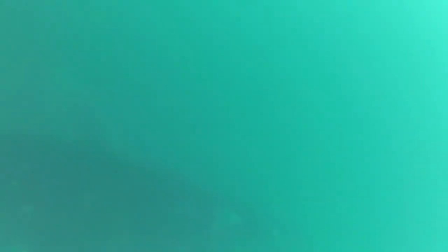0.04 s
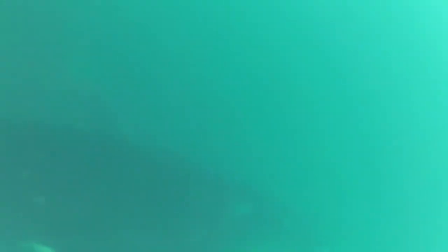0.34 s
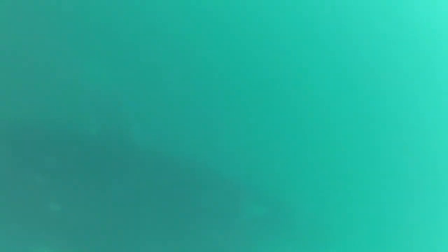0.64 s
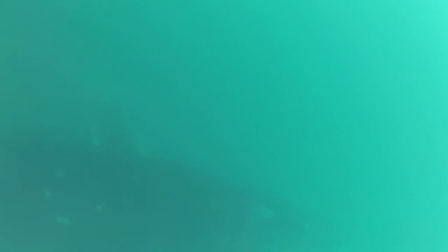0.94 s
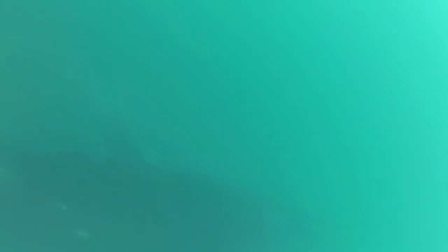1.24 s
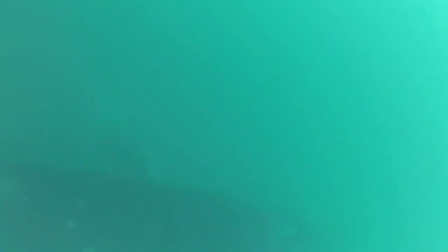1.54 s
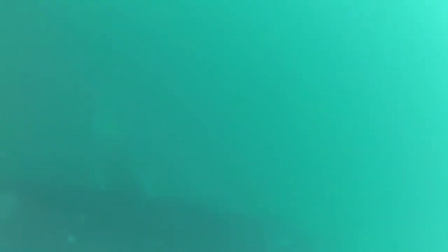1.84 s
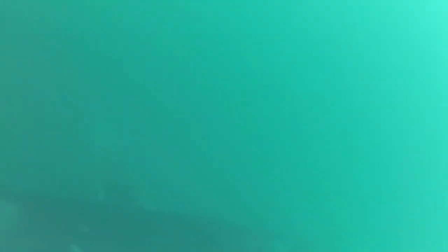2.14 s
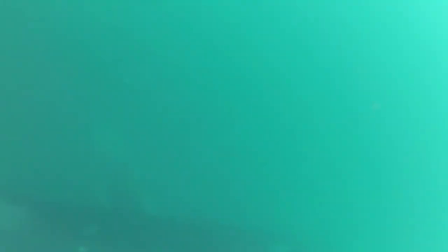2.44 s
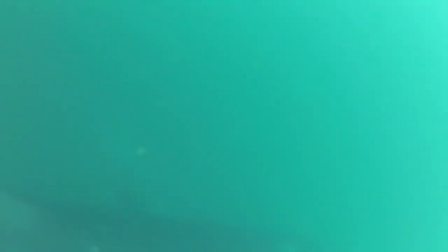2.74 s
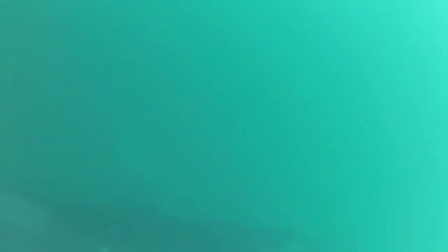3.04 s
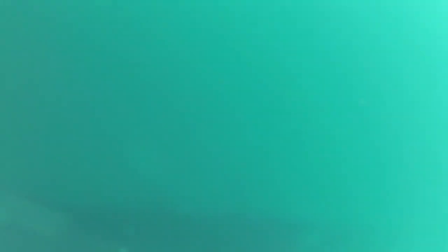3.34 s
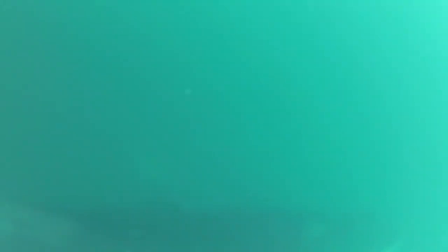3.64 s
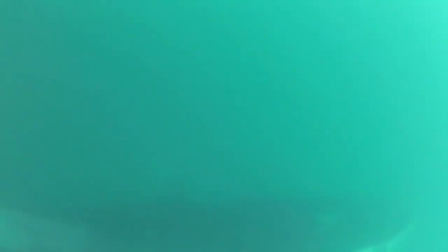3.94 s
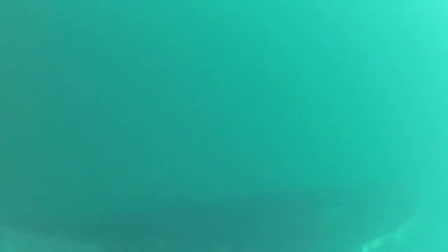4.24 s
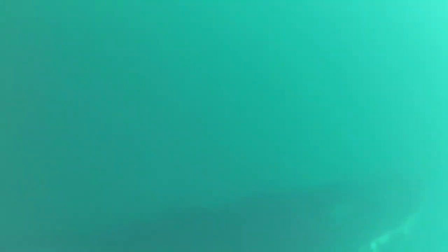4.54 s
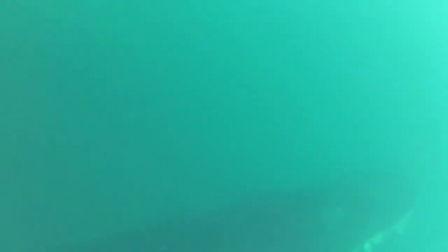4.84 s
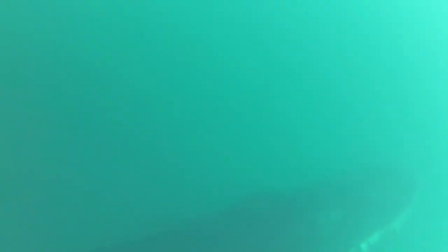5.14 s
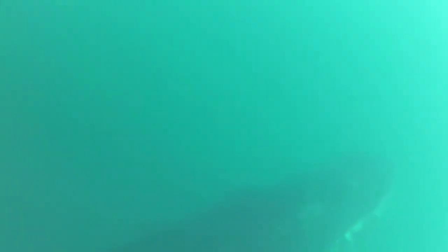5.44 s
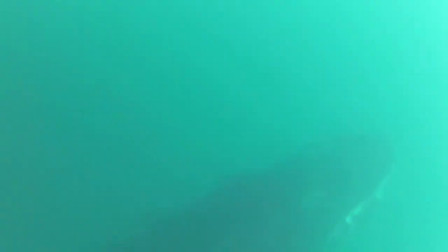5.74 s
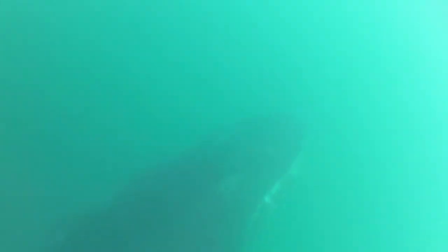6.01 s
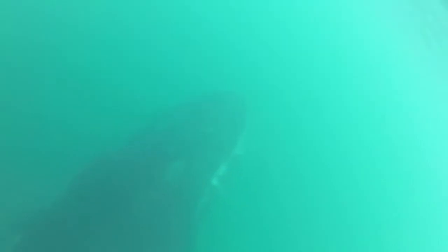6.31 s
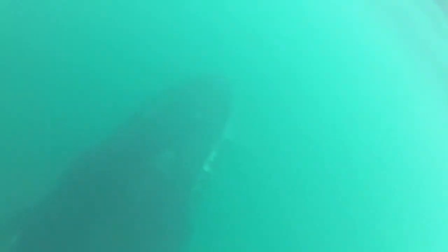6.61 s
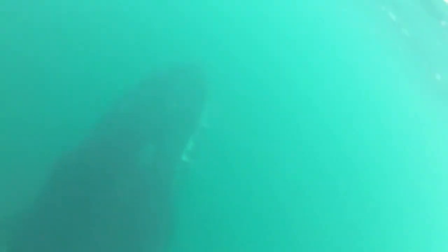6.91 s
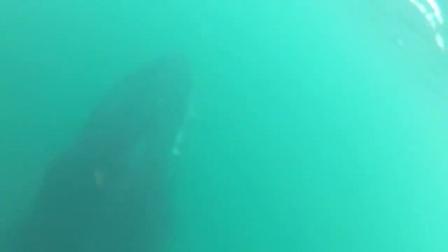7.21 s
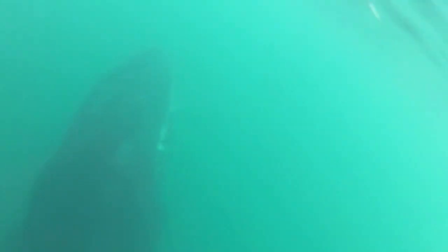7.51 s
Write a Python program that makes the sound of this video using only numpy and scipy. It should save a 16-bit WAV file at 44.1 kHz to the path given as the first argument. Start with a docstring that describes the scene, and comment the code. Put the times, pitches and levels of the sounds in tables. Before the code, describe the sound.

A low, throbbing boat motor idles through bubbly, sloshing water with a faint fizz, muffled by the sealed housing of a submerged camera. An early clunk on the mount gives way to uneven surges of water as the hum swells. A second group of ringing knocks and brief scrapes comes next. Scattered bubbles pop right by the microphone, the sharpest near the end, followed by a quick cluster.

```python
"""A camera in a waterproof housing is held under water beside an idling boat.
From the start the engine hums over a churning wash. Just before 1 s the camera's mount is knocked
and rings, then water rushes round the housing in surges until about 3 s. More knocks and short
scrapes follow from 3.4 to 4.5 s. Small bubbles pop close by now and then: the loudest comes
just after 6 s, and a quick run of them ends the scene."""
import sys
import numpy as np
from scipy import signal
from scipy.fft import rfft, irfft
from scipy.io import wavfile

SR = 44100
rng = np.random.default_rng(int(sys.argv[2]) if len(sys.argv) > 2 else 0)


def transcribe(signal):
    """Save signal, clipped to [-1, 1], as a 16-bit WAV file at the path in sys.argv[1]."""
    frames = np.atleast_2d(signal).T
    limited = np.clip(frames, -1, 1)
    pcm = np.round(limited * 32767).astype(np.int16)
    wavfile.write(sys.argv[1], SR, pcm)


N = 333837
TIME = np.arange(N) / SR
ENGINE_HZ, CYLINDERS = 32.5, 6  # one engine cycle lasts six waves of this main tone

# Levels in the tables are relative: the functions add their own gains.
# How strong the engine's main tone is at the camera: time_s, level_db
HUM_LEVELS = [(0, -29.5), (0.65, -31), (0.8, -20.5), (1.1, -26.5), (1.3, -18.5), (1.5, -23.5), (2.26, -24),
              (2.4, -12.5), (2.98, -22.5), (3.08, -29), (3.65, -35.5), (3.83, -20), (4.0, -29), (4.68, -27),
              (5.2, -46.5), (5.9, -32.5), (7.1, -28.5), (7.57, -30.5)]
# Other engine tones, one below the main tone and the rest above; some are there because
# the cylinders are unequal: multiple_of_cycle_rate, level_db
OTHER_ENGINE_TONES = [(5, -38), (7, -52), (10, -62), (11, -59), (12, -43), (14, -62), (16, -57), (18, -48),
                      (20, -55), (30, -53), (60, -58), (108, -51)]
# The low rumble of the swaying mount: pitch_hz, level_db
SWAY_SPECTRUM = [(24, -23), (27.5, -1.5), (32, -5.5), (37, 1), (42, 2.5), (50, -25)]
# Blows on the mount: start_s, strength_db, brightness_db, tuning_factor, swell_cycles,
# damping_factor, favoured_hz
MOUNT_BLOWS = [(0.7005, -18.7, 8, 1.053, 1.7, 1.8, 610), (0.7391, -21, 2.5, 1.05, 7.6, 1.6, 610),
               (0.851, -30.5, -3, 1.04, 6.4, 1.45, 527), (3.4172, -15.5, 3, 1.023, 1.7, 1.8, 611),
               (3.7507, -11.5, -1, 1.04, 0.71, 2.26, 667), (4.019, -35.5, -12, 1.035, 7.1, 1.7, 615),
               (4.181, -41, -9, 1.01, 4.6, 1.4, 630), (4.2429, -21.5, -7.5, 1.01, 0.7, 1.6, 628),
               (4.424, -33, -21, 1.0, 1.6, 0.68, 620), (4.5233, -17.5, -7.5, 1, 1.05, 1.4, 630)]
# The notes (modes) the mount and housing ring with: pitch_hz, level_db, ring_s (time to fade 60 dB)
MOUNT_MODES = [(42.1, -0.5, 0.36), (88.7, -16.5, 0.23), (165.4, -4, 0.18), (205.5, 1, .24),
               (312.5, -5, 0.12), (352, -5.5, 0.032), (506, 3.5, 0.076), (586.5, -2.5, 0.13),
               (620.3, 4.5, 0.06), (644, -3.5, 0.077), (749, -9, 0.11), (972, 5.5, 0.084),
               (1006, -3, 0.059), (1130, 5.5, 0.033), (1325, 2.5, 0.052), (1390, 10, 0.019),
               (1620, 3.5, 0.063), (1682, -13.5, 0.022), (1730, -6.5, 0.072), (1718, -4, 0.078),
               (2920, -15.5, 0.13), (3368, -2, 0.09), (3690, -14, 0.07), (3600, -6, 0.071),
               (4220, -17, 0.033)]
# Borders between five families of modes (thump, body, ring, clack, tick): pitch_hz
FAMILY_BORDERS = [0, 430, 880, 1220, 2500, 6000]
# How each family answers a blow, harder blows being brighter:
# base_db (for a -20 dB blow), db_per_strength_db, brightness_share
FAMILY_RESPONSES = [(-21, 0.66, 0.1), (-19.5, 0.5, 0.048), (-33, 0.5, 1), (-33.5, 1.22, 0.44),
                    (-49, 1.55, 0.95)]
# Bubbles popping close by: start_s, peak_db, pitch_hz, swell_cycles, crackle_share (0 to 1)
BUBBLE_POPS = [(0.232, -28.5, 1940, 5.2, 0.4), (0.9953, -24.5, 1370, 1.8, 0.3),
               (1.935, -41, 4030, 1.8, 0.4), (2.859, -35, 3000, 2.9, 0.53), (2.987, -31, 1390, 1.9, 0.44),
               (4.343, -17, 1623, 2.3, 0.23), (6.0788, -33, 5460, 4.8, 0.51), (6.1764, -4, 2003, 5.7, 0.08),
               (6.2138, -43.5, 5440, 3.1, 0.5), (6.3323, -36, 3380, 7.4, 0.3),
               (6.356, -32.5, 1980, 4.4, 0.47), (6.856, -42, 3300, 3.9, 0.3),
               (7.084, -20.5, 1680, 1.5, 0.35), (7.0837, -21, 2650, 2.0, 0.36),
               (7.102, -22.5, 1435, 0.68, 0.57), (7.102, -17, 2520, 3.2, 0.47),
               (7.2098, -18, 2750, 1.3, 0.22), (7.2597, -15, 3900, 1.5, 0.56),
               (7.4982, -25.5, 1850, 1.0, 0.45)]
# Surges of water past the housing: start_s, length_s, level_db
WATER_SURGES = [(1.14, 0.31, -38.5), (1.55, 0.24, -38), (1.85, 0.093, -35), (2.05, 0.095, -35.5),
                (2.27, 0.29, -34.5), (2.73, 0.13, -38), (2.92, 0.093, -40), (3.98, 0.26, -37.5),
                (4.68, 0.095, -43.5), (5.93, 0.25, -46.5)]
# The tone colour of that rushing water: pitch_hz, level_db
RUSH_SPECTRUM = [(25, -1), (45, 11), (70, 3.5), (110, -3.5), (175, 3.5), (220, 4.5), (250, -16), (320, -5),
                 (420, -14), (530, -31), (610, -5), (800, -27), (1800, -41), (3000, -52)]
# The housing scraping in its mount: start_s, length_s, level_db, pitch_hz, relative_width
MOUNT_SCRAPES = [(0.845, 0.14, -68, 4700, 0.28), (1.116, 0.18, -65, 4900, 0.36),
                 (3.419, 0.074, -53, 3470, 0.1), (3.422, 0.044, -39.5, 1780, 0.08),
                 (3.987, 0.2, -49.5, 1900, 0.039), (4.02, 0.066, -56.5, 3350, 0.087),
                 (4.237, 0.02, -35.5, 1940, 0.049), (4.517, 0.017, -36.5, 1950, 0.06)]
# How strongly the water churns round the boat: time_s, level_db
WASH_LEVELS = [(0, -38.5), (2.5, -38), (4.5, -39.5), (5.9, -37.5), (7.0, -35), (7.57, -35.5)]
# The tone colour of that wash: pitch_hz, level_db
WASH_SPECTRUM = [(30, -2), (80, -13), (130, -3.5), (260, -7), (330, -4.5), (480, -2), (700, 0.5),
                 (820, -6.5), (950, -8), (1080, -21), (1220, -11.5), (1450, -15.5), (1850, -17.5),
                 (2900, -46.5)]
# Pitches in the wash that echoes in the water reinforce: pitch_hz, width_hz, boost_db
WASH_PEAKS = [(520, 65, 0), (585, 25, 4.5), (620, 95, 2), (760.5, 47, 5.5), (1194, 69, 5.5),
              (1335, 11, 8.5), (1744, 28, 7), (1960, 390, 4.5), (2010, 54, -3), (2750, 110, 16)]
# Clouds of fine bubbles in the wash: start_s, length_s, level_db
FROTH_CLOUDS = [(0.0, 0.44, -61.5), (1.48, 0.44, -66.5), (2.845, 0.21, -52.5), (5.17, 0.4, -59),
                (5.9, 0.59, -66)]
# The tone colour of their fizz: pitch_hz, level_db
FIZZ_SPECTRUM = [(1200, -4), (2300, 6), (3000, -6.5), (3450, -5.5), (4000, -14), (5200, -19), (6000, -16)]


def engine_hum(turns, hum_db=-2.53, throb_db=1.5, waver_db=2.5, sway_db=-33.5, sway_follow=0.68):
    """A deep tone throbs and beats against the swaying mount; other tones waver through the water."""
    level_db = follow(HUM_LEVELS)
    hum = gain_of(level_db + hum_db + throb_db * np.tanh(drift(6.0))) * np.sin(2 * np.pi * turns)
    for multiple, db in OTHER_ENGINE_TONES:
        phase = 2 * np.pi * (round(multiple) * turns / CYLINDERS + rng.random()) + 0.58 * drift(5.7)
        hum += gain_of(db + waver_db * drift(2.9)) * np.sin(phase)
    sway = noise(SWAY_SPECTRUM) * gain_of(sway_db + sway_follow * (level_db - level_db.mean()))
    return np.sqrt(2) * hum + sway


def mount_knocks(favour_db=7, favour_width_hz=32, crack_hz=1850, crack_s=0.031,
                 splash_hz=5600, splash_s=0.014, chatter_db=2.27):
    """Each blow cracks, then rings the mount and housing; high notes come first, low ones swell later."""
    out, t = np.zeros(N), np.arange(SR // 2) / SR
    hz, db, ring_s = np.transpose(MOUNT_MODES)[:, :, None]
    family = np.digitize(hz, FAMILY_BORDERS) - 1
    is_thump = family == 0
    sign = (-1) ** np.arange(len(hz))[:, None]
    for start_s, strength_db, brightness_db, tuning, cycles, damping, favoured_hz in MOUNT_BLOWS:
        family_db = [base_db + slope * (strength_db + 20) + share * brightness_db
                     for base_db, slope, share in FAMILY_RESPONSES]
        swell = 1 - np.exp(-t * hz / (cycles * np.where(is_thump, 0.99, 1)))
        # where the blow lands favours one pitch; lasting contact damps all but the thump
        place_db = favour_db * np.exp(-((hz * tuning - favoured_hz) / favour_width_hz) ** 2)
        decay_db = 60 * t / ring_s * np.where(is_thump, 1, damping)
        phase = 2 * np.pi * (hz * tuning * t + 0.19 * rng.standard_normal(hz.shape))
        modes = sign * swell * gain_of(db + place_db - decay_db) * np.sin(phase)
        for k, level_db in enumerate(family_db):
            ring = modes[family[:, 0] == k].sum(0)
            add(out, start_s, gain_of(level_db) * ring / np.std(ring[:SR // 50]))
        clack_db, tick_db = family_db[-2:]
        crack = hiss(len(t), crack_hz, width=0.069) * (1 - np.exp(-t * crack_hz / cycles))
        add(out, start_s, crack * gain_of(clack_db + 2 - 60 * t / crack_s))
        # a brief treble splash, as when a sharp blow overloads the recorder
        splash = hiss(len(t), splash_hz, width=0.138) / (1 + cycles ** 4)
        add(out, start_s + 0.0016, splash * gain_of(tick_db + 1 - 60 * t / splash_s))
    # the loose mount chatters as it rings
    return out * gain_of(chatter_db * drift(140))


def bubble_pops(ring_cycles=45, crackle_life=0.79, echo_s=0.011, echo_db=-27.5):
    """A bubble rings briefly at its own pitch; the harder it tears, the wider its crackle."""
    out, t = np.zeros(N), np.arange(SR // 10) / SR
    for start_s, peak_db, hz, swell_cycles, share in BUBBLE_POPS:
        decay_db = 60 * t * hz / ring_cycles
        onset = 1 - np.exp(-(t * hz / swell_cycles) ** 3)
        ring = np.sin(2 * np.pi * hz * t) * gain_of(-decay_db)
        crackle = hiss(len(t), hz, width=0.12 + 0.32 * share ** 2) * gain_of(-decay_db / crackle_life)
        pop = onset * ((1 - share) * ring + share * crackle)
        pop = gain_of(peak_db) * pop / abs(pop).max()
        add(out, start_s, pop)
        add(out, start_s + echo_s, gain_of(echo_db) * pop)  # echo off the water's surface
    return out


def rushing_water(rush_db=6.0, eddy_db=2.0):
    """Swirls of water push against the housing in uneven surges."""
    surges = swells(WATER_SURGES, rise_s=0.015, fall_s=0.045)
    return noise(RUSH_SPECTRUM) * surges * gain_of(rush_db + eddy_db * drift(35))


def mount_scrapes(grain_db=3.5):
    """The housing rubs in its mount, making short grainy scrapes that swell and fade."""
    out = np.zeros(N)
    for start_s, length_s, db, hz, width in MOUNT_SCRAPES:
        size = round(length_s * SR)
        add(out, start_s, gain_of(db) * hiss(size, hz, width) * np.hanning(size))
    return out * gain_of(grain_db * drift(130))


def churning_wash(turns, wash_db=1.18, fizz_db=3.5, fizz_follow=0.29, sparkle_db=2.0, crest_s=0.14):
    """Bubbly water sloshes with each cycle of the engine and pulses as it fires."""
    pulse_db = 0.47 * np.cos(2 * np.pi * 2 * turns) + 0.91 * drift(48)
    cycle = 2 * np.pi * (turns - ENGINE_HZ * crest_s) / CYLINDERS
    slosh_db = 0.9 * np.cos(cycle) + 0.7 * np.cos(2 * cycle) + 0.5 * drift(3.2)
    level_db = follow(WASH_LEVELS) + slosh_db
    wash = noise(WASH_SPECTRUM, WASH_PEAKS) * gain_of(level_db + wash_db + pulse_db)
    # fine bubbles fizz: a slowly thinning froth, with thicker clouds now and then
    thinning = gain_of(-59.5 - 0.26 * TIME)
    clouds = gain_of(fizz_db) * swells(FROTH_CLOUDS, rise_s=0.032, fall_s=0.3)
    froth = np.hypot(thinning, clouds)
    stir_db = fizz_follow * (level_db - level_db.mean() + pulse_db)
    fizz = noise(FIZZ_SPECTRUM) * froth * gain_of(fizz_db + stir_db + sparkle_db * drift(200))
    return wash + fizz


def gain_of(db):
    """Turns decibels into a number to multiply a sound by."""
    return 10 ** (np.asarray(db) / 20)


def unit_level(x):
    """Scales a signal so that its average size (rms) is 1."""
    return x / np.sqrt(np.mean(x ** 2) + 1e-20)


def follow(rows):
    """Joins (time_s, value) points with straight lines, giving a value at every sample."""
    return np.interp(TIME, *np.transpose(rows))


def add(mix, start_s, sound):
    """Mixes a sound in at its start time."""
    part = mix[max(round(start_s * SR), 0):][:len(sound)]
    part += sound[:len(part)]


def swells(rows, rise_s, fall_s):
    """A loudness curve made of swells that each rise, hold and fall."""
    strength = np.zeros(N)
    for start_s, length_s, db in rows:
        ramps = np.minimum((TIME - start_s) / rise_s, (start_s + length_s - TIME) / fall_s)
        strength += gain_of(db) * np.clip(ramps, 0, 1)
    return strength


def noise(spectrum, peaks=()):
    """Noise with a given tone colour and boosted pitches, falling away steeply past both ends."""
    hz = np.fft.rfftfreq(N, 1 / SR) + 1
    point_hz, point_db = np.transpose(spectrum)
    db = np.interp(np.log(hz), np.log(point_hz), point_db)
    for centre_hz, width_hz, boost_db in peaks:
        db += boost_db / (1 + (2 * (hz - centre_hz) / width_hz) ** 2)
    ends = np.minimum(point_hz[-1] / hz, 1) ** 4 * np.minimum(hz / point_hz[0], 1) ** 3
    return unit_level(irfft(rfft(rng.standard_normal(N)) * gain_of(db) * ends, N))


def hiss(size, centre_hz, width):
    """A short stretch of noise round one pitch; width is a fraction of that pitch."""
    hz = np.fft.rfftfreq(size, 1 / SR) + 1
    falloff = 1 + (np.log(hz / centre_hz) / width) ** 2
    return unit_level(irfft(rfft(rng.standard_normal(size)) / falloff, size))


def drift(rate_hz):
    """A random wobble round zero; a higher rate makes it quicker."""
    hz = np.fft.rfftfreq(N, 1 / SR)
    low_pass = np.exp(-(hz / rate_hz) ** 2) * (hz > 0)
    return unit_level(irfft(rfft(rng.standard_normal(N)) * low_pass, N))


def scene():
    """Everything reaches both channels alike through the sealed housing."""
    # counts the waves of the engine's main tone as its speed wanders slightly
    turns = np.cumsum(ENGINE_HZ * (1 + 0.00193 * drift(1.24))) / SR
    boat = engine_hum(turns) + churning_wash(turns)
    sound = boat + rushing_water() + mount_knocks() + mount_scrapes() + bubble_pops()
    return np.array([sound, sound])


def record(dry, coarse_hz=12000, top_hz=15300):
    """The camera filters, samples coarsely, clips and holds each value, adding a thin treble fizz."""
    input_filter = signal.firwin(127, 0.48 * coarse_hz, fs=SR)
    filtered = signal.oaconvolve(dry, input_filter[None], "same")
    coarse = signal.resample_poly(filtered, coarse_hz, SR, axis=1).clip(-0.92, 0.92)
    steps = np.repeat(coarse, 4, axis=1)  # holding values mirrors the sound into the treble
    held = signal.resample_poly(steps, SR, 4 * coarse_hz, axis=1)[:, :N]
    output_filter = signal.firwin(127, top_hz, window=("kaiser", 8), fs=SR)
    return signal.oaconvolve(held, output_filter[None], "same")


dry = scene()
out = record(dry)
transcribe(out)
```